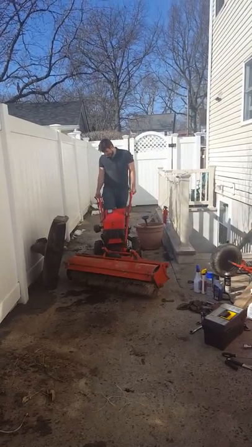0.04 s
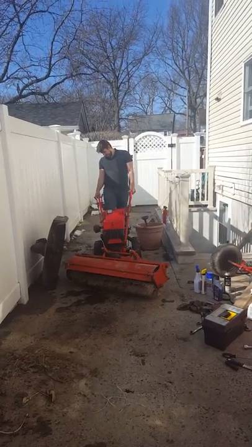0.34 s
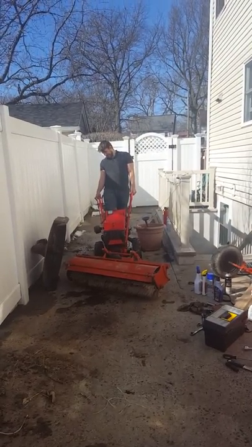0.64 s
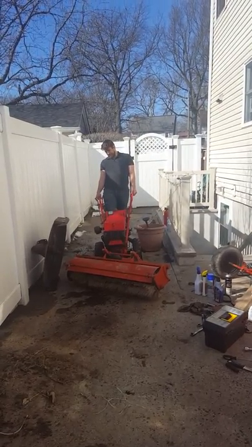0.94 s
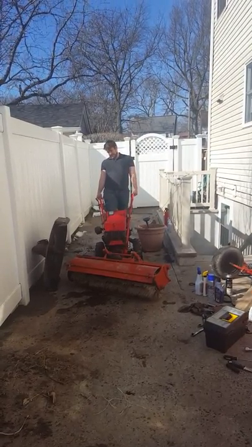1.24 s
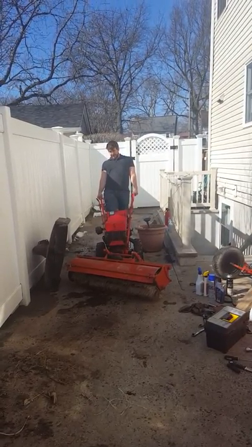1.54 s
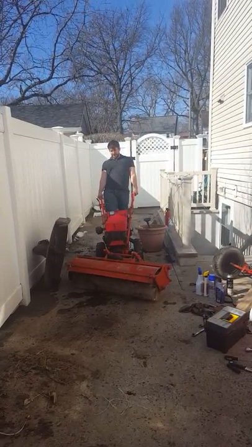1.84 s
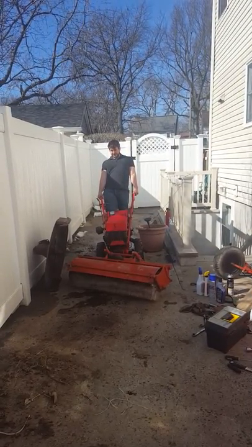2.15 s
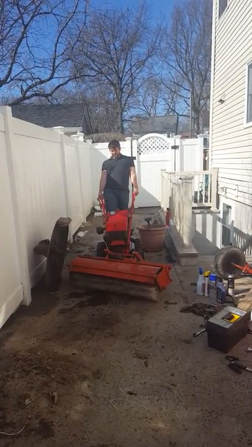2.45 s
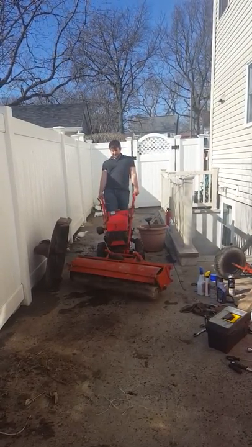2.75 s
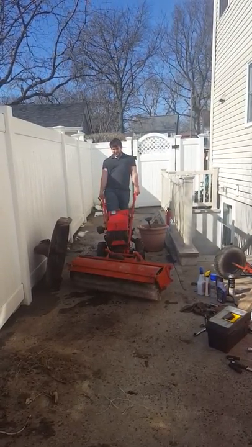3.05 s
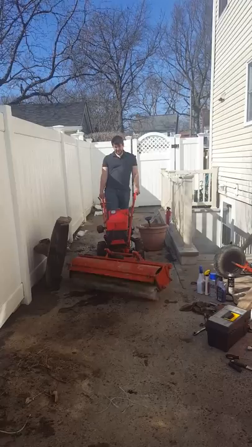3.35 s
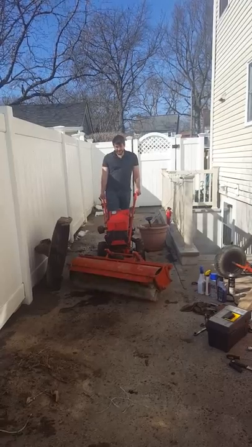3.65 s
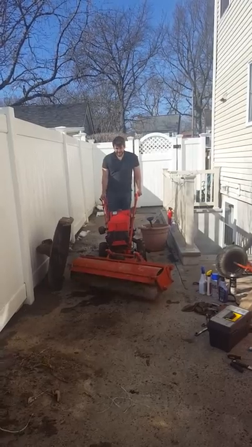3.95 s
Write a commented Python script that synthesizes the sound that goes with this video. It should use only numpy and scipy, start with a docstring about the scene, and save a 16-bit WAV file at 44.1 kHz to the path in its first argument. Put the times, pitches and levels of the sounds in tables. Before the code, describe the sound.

A small single-cylinder engine starts in a narrow yard. For the first 1.5 seconds there is only light wind on the microphone, a faint distant town and a few small clicks. At 1.6 seconds the starter grinds, with a clack and soft cylinder puffs. At about 2.7 seconds the engine catches and speeds up until 4 seconds, its loud thumps echoing closely over valve clatter and a rising gear whine.

```python
"""Light wind, a distant town and a few small clicks; then a single-cylinder four-stroke engine is started.
The starter's gear teeth grind for a second while the cylinder puffs; the engine catches and speeds up.
Each firing is a thump that flutters between the fence and house wall of a narrow yard, and a spit of gas.
Under the firings run valve clatter and a rising gear whine."""
import sys
import numpy as np
from scipy import signal
from scipy.fft import rfft, irfft
from scipy.io import wavfile

SR = 44100
rng = np.random.default_rng(int(sys.argv[2]) if len(sys.argv) > 2 else 0)


def pcm_store(signal):
    """Save signal as 16-bit PCM."""
    levels = np.round(np.clip(np.atleast_2d(signal), -1, 1) * 32767)
    wavfile.write(sys.argv[1], SR, levels.astype(np.int16).T)


N = 176400
FFT_SIZE = 196608


def undb(db):
    """Decibels to gain."""
    return 10 ** (np.asarray(db) / 20)


def unit(x):
    """Scale to rms 1."""
    return x / np.sqrt(np.mean(x ** 2))


def curve(rows, t, column=1):
    """One column of a table at the times t."""
    rows = np.array(rows)
    return np.interp(t, rows[:, 0], rows[:, column])


def gains(eq):
    """An EQ curve of (Hz, dB) points as gains on the FFT grid."""
    hz, db = np.array(eq).T
    grid_hz = np.arange(FFT_SIZE // 2 + 1) * SR / FFT_SIZE
    return undb(np.interp(np.log(grid_hz + 1e-9), np.log(hz), db))


def colour(x, eq):
    """Minimum-phase EQ: nothing rings ahead of a hit."""
    cepstrum = irfft(np.log(gains(eq)))
    cepstrum[1:FFT_SIZE // 2] *= 2
    cepstrum[FFT_SIZE // 2 + 1:] = 0
    return irfft(rfft(x, FFT_SIZE) * np.exp(rfft(cepstrum)))[..., :N]


def white():
    """White noise as a mid and side pair."""
    return rng.standard_normal((2, N))


def noise(eq):
    """A pair of coloured noises of rms 1."""
    return unit(colour(white(), eq))


def strikes(times, db):
    """Impulses at the given times and levels."""
    at = np.clip(np.asarray(times) * SR, 0, N).astype(int)
    return np.bincount(at, undb(db), N + 1)[:N]


def ring(x, response):
    """Pass x through an impulse response."""
    return signal.fftconvolve(np.atleast_2d(x), np.atleast_2d(response), axes=1)[:, :N]


def bursts(times, db, envelope):
    """White noise that follows one envelope after each event; overlaps add in power."""
    power = ring(strikes(times, 2 * np.asarray(db)), envelope ** 2)
    return np.sqrt(np.abs(power)) * white()


# The gusts. Each row: time in seconds, level in dB.
GUSTS = [(0.0, -61), (0.03, -41), (0.06, -60), (0.362, -47), (0.388, -66), (0.474, -48), (0.62, -64),
         (0.66, -46.5), (0.702, -66), (0.798, -61), (0.824, -43), (1.096, -51.5), (1.144, -76),
         (1.338, -57), (1.476, -60), (1.55, -56)]
# Their low rumble. Each row: frequency in Hz, relative level in dB.
WIND_EQ = [(20, -25), (50, -2.5), (75, 11), (120, -2), (220, -14.5), (500, -53)]
def breeze(t, trim_db=-4, right_over_left_db=18):
    """Light wind rumbles on the microphone, more on the right."""
    pan = undb(np.array([[-right_over_left_db], [right_over_left_db]]) / 2)
    return pan * undb(trim_db + curve(GUSTS, t)) * noise(WIND_EQ)[0]


# A dark ambience bed. Each row: frequency in Hz, relative level in dB.
TOWN_EQ = [(15, -4), (25, -2.5), (64, -4.5), (102, -3), (157, -4.5), (249, -8.5), (344, -17.5), (451, -16),
           (516, -20.5), (863, -19.5), (3160, -38), (6210, -42), (7510, -45), (14800, -46), (16000, -50)]
def town():
    """The faint, steady wash of a distant town."""
    return undb(-53) * noise(TOWN_EQ)


# The click cues. Each row: start in seconds, knock level in dB, tick level in dB.
CLICKS = [(.266, -49, -68), (.574, -53, -68), (.858, -56, -54), (.93, -49, -60), (1.155, -55, -61),
          (1.219, -45.5, -62)]
# Tone of the knock and of the tick. Each row: frequency in Hz, gain in dB.
KNOCK_EQ = [(200, -14), (800, 7), (1600, -4), (3000, -11), (6000, -16.5), (14000, -26)]
TICK_EQ = [(1500, -15), (4500, -1), (14000, -6), (16000, -15)]
def control_clicks(t, knock_fall_s=0.028, tick_fall_s=0.006):
    """Small clicks at the controls, each a dull knock with a bright tick on top."""
    times, knock_db, tick_db = np.array(CLICKS).T
    ticks = colour(bursts(times, tick_db, np.exp(-t / tick_fall_s)), TICK_EQ)
    knocks = colour(bursts(times, knock_db, np.exp(-t / knock_fall_s)), KNOCK_EQ)
    return knocks + ticks


# Metal resonances. Each row: pitch in Hz, relative level in dB.
HOUSING_MODES = [(231, -41), (380, -30), (436, -33), (474, -36), (587, -34), (786, -34), (903, -34.5),
                 (1077, -37.5), (1260, -40), (1631, -39.5), (2163, -44), (2828, -58), (5050, -47),
                 (6650, -46), (8500, -48)]
def housing(t, teeth, ring_s=0.026):
    """The starter and its housing ring as damped tones, shaken by the gear teeth."""
    brief = t[:SR // 2]
    decay = np.exp(-brief / ring_s)
    return sum(undb(db) * unit(ring(teeth, np.sin(2 * np.pi * hz * brief) * decay))
               for hz, db in HOUSING_MODES)


# The starter's faders. Each row: time in seconds, grind level in dB, hiss level in dB.
CRANK = [(1.55, -82, -78), (1.562, -41, -78), (1.592, -27.5, -35), (1.602, -26, -44), (1.616, -21.5, -31.5),
         (1.68, -22, -31.5), (1.714, -19.5, -30), (1.72, -17.5, -22.5), (1.776, -18, -27.5),
         (2.076, -18.5, -25.5), (2.126, -17, -27), (2.22, -18, -24), (2.26, -19, -24.5), (2.416, -16, -24),
         (2.512, -17.5, -25), (2.65, -18, -23.5)]
# Tone of its growl, grind and hiss. Each row: frequency in Hz, relative level in dB.
GROWL_EQ = [(40, -58), (90, -23), (150, 0), (240, -0.5), (390, -3), (700, -33)]
GRIND_EQ = [(50, -40), (100, -28), (140, -4), (220, -3), (420, -1), (502, -3.5), (676, 0), (1100, 1),
            (1580, -5.5), (1900, -7), (2270, -5), (2620, -11), (3000, -10), (3900, -18), (5650, -28),
            (6840, -29), (16000, -39)]
HISS_EQ = [(2500, -16.5), (4500, 3), (5700, 2), (6700, 5), (7800, 0.5), (11500, -3), (13700, -0.5),
           (16000, -7.5)]
def starter(t, free_teeth_per_s=230, sag=0.38, tooth_s=0.0054, release_s=2.8, coast_s=0.11):
    """Gear teeth grind, slowed by compression before each puff, and fade once the engine runs."""
    strokes = [at for at, db in PUFFS] + [SPEED[0][0]]
    compression = np.interp(t, strokes, np.arange(len(strokes))) % 1
    teeth_passed = np.cumsum(free_teeth_per_s * (1 - sag * compression)) / SR
    jitter, scatter = rng.standard_normal((2000, 2)).T
    times = np.interp(np.arange(len(jitter)) + 0.14 * jitter, teeth_passed, t, right=N / SR + 1)
    tooth_db = 2.5 * scatter
    growl = unit(colour(strikes(times, tooth_db), GROWL_EQ))
    teeth = unit(bursts(times, tooth_db, np.exp(-t / tooth_s))) + 0.98 * white()
    grind = unit(colour(teeth, GRIND_EQ)) + undb(18) * housing(t, teeth) + undb(-8) * growl
    hiss = noise(HISS_EQ) * undb(curve(CRANK, t, column=2) - 2.5)
    fade_in = np.clip((t - CRANK[0][0]) / 0.014, 0, 1)
    fade_out = np.exp(-np.maximum(t - release_s, 0) / coast_s)
    return fade_in * fade_out * (grind * undb(curve(CRANK, t)) + hiss)


# Unfired strokes. Each row: peak time in seconds, level in dB.
PUFFS = [(1.606, -49), (1.816, -27.5), (2.054, -26.5), (2.281, -27), (2.485, -28)]
# Their low breath. Each row: frequency in Hz, relative level in dB.
PUFF_EQ = [(30, -35), (60, -5), (90, 0), (125, 7), (170, -8), (400, -49)]
def puffs(t, pipe_hz=105, width_s=0.016):
    """The cranked cylinder lets out soft puffs that ring the exhaust briefly."""
    swells = sum(undb(db) * np.exp(-0.5 * ((t - at) / width_s) ** 2) for at, db in PUFFS)
    pipe = np.sqrt(2) * np.sin(2 * np.pi * pipe_hz * t) * np.array([[1], [0]])  # mid only
    return swells * (pipe + 0.46 * noise(PUFF_EQ))


# A hard, bright clack. Each row: frequency in Hz, gain in dB.
CLACK_EQ = [(500, -15), (2500, 2), (6000, 4.5), (9000, -2.5), (16000, 2)]
def gear_clack(t, start_s=1.72, fall_s=0.035):
    """The starter gear bangs home."""
    return colour(bursts([start_s], [-19.5], np.exp(-t / fall_s)), CLACK_EQ)


# The run-up, from the first firing. Each row: time in seconds, firings per second.
SPEED = [(2.663, 6.506), (2.8, 7.753), (2.95, 12.756), (3.15, 18.439), (3.35, 22.179), (3.6, 25.308),
         (4.0, 28.154)]
def run_up(t):
    """The engine fires once a cycle: gives the running cycle count and the firing times."""
    cycles = np.cumsum(curve(SPEED, t) * (t >= SPEED[0][0])) / SR
    firings = t[np.searchsorted(cycles, np.arange(int(cycles[-1]) + 1), side="right")]
    return cycles, firings


# Punch of the firings. Each row: time in seconds, then thump, bark and gas spit drive in dB.
EFFORT = [(2.66, 35, 31, -17), (2.85, 36, 26.5, -12.5), (3.0, 35, 22, -13), (3.2, 35.5, 29, -15),
          (3.45, 31, 33, -18.5), (3.7, 30.5, 35, -19), (4.0, 35.5, 34.5, -19.5)]
# Tone of the deep thump and of the bark above it. Each row: frequency in Hz, gain in dB.
THUMP_EQ = [(20, -62), (35, -29), (50, -5.5), (75, 2.5), (105, 5), (160, -2.5), (250, -13.5), (500, -40),
            (1500, -71)]
BARK_EQ = [(30, -41), (90, -12), (145, 6), (200, 0.5), (260, -0.5), (340, -23), (500, -25.5), (1500, -52)]
# Slapback from fence and house. Each row: delay in seconds, gain.
WALLS = [(.0096, 0.51), (0.0147, 0.38), (0.0186, .36), (.0285, 0.45), (.041, 0.22)]
def exhaust(t, firings, lead_s=0.0008, reverb_fall_s=0.05):
    """A pressure pulse just ahead of each spit of gas, fluttering between the walls."""
    times = firings - lead_s
    scatter = rng.standard_normal((len(times), 2))
    thump = strikes(times, curve(EFFORT, times) + 0.5 * scatter[:, 0])
    bark = strikes(times, curve(EFFORT, times, column=2) + 0.81 * scatter[:, 1])
    direct = colour(thump, THUMP_EQ) + colour(bark, BARK_EQ)
    echoes = sum(gain * np.interp(t - delay, t, direct, left=0) for delay, gain in WALLS)
    tail = white() * np.exp(-t / reverb_fall_s)
    reverb = undb(-13) * ring(direct, tail / np.linalg.norm(tail))
    return np.array([direct + echoes, echoes]) + reverb


# The sizzle of the gas. Each row: frequency in Hz, gain in dB.
SPIT_EQ = [(300, -1.5), (1200, -8), (2800, 1), (4000, -6.5), (6200, -0.5), (8000, -3), (11000, 0.5),
           (13700, 4.5), (16000, -3)]
def gas_spit(t, firings, rise_s=0.0049, fall_s=0.0043, wash_fall_s=0.033):
    """A sharp spit of gas at each firing; its wash in the yard weakens with speed."""
    spit = np.minimum(t / rise_s, 1) * np.exp(-np.maximum(t - rise_s, 0) / fall_s)
    wash = np.minimum(t / 0.02, 1) * np.exp(-np.maximum(t - 0.016, 0) / wash_fall_s)
    spit_db = curve(EFFORT, firings, column=3) + 0.65 * rng.standard_normal(len(firings))
    wash_db = spit_db - 2 - 0.17 * curve(SPEED, firings)
    return colour(bursts(firings, spit_db, spit) + bursts(firings, wash_db, wash), SPIT_EQ)


# The clatter's fader. Each row: time in seconds, level in dB.
CLATTER_LEVEL = [(2.64, -45), (2.85, -19), (3.0, -20), (3.25, -20), (3.5, -20.5), (3.75, -20.5), (4.0, -22)]
# Its boxy tone. Each row: frequency in Hz, relative level in dB.
CLATTER_EQ = [(180, -22.5), (300, 1.5), (343, -6.5), (447, -6), (502, -7), (994, -5.5), (1190, -6.5),
              (1610, -10.5), (1750, -13.5), (2170, -13), (3890, -21), (6000, -19.5), (7570, -26),
              (9090, -20.5), (12300, -35), (13800, -26), (16000, -29)]
def valve_clatter(t, cycles, per_cycle=8, knock_s=0.0031):
    """Valves and piston knock in the same pattern every cycle, over a bed of noise."""
    pattern = (np.arange(per_cycle) + rng.uniform(-0.3, 0.3, per_cycle)) / per_cycle
    knock_cycles = np.arange(int(cycles[-1]) + 1)[:, None] + pattern
    accents_db = -2 * rng.standard_normal(per_cycle)
    db = accents_db + 0.54 * rng.standard_normal(knock_cycles.shape)
    times = np.interp(knock_cycles.ravel(), cycles, t)
    knocks = bursts(times, db.ravel(), np.exp(-t / knock_s))
    clatter = colour(knocks + 0.83 * white(), CLATTER_EQ)
    clatter /= np.std(clatter[0, cycles > 1])
    return clatter * undb(curve(CLATTER_LEVEL, t)) * (cycles > 0)


# The whine's fader. Each row: time in seconds, level in dB.
WHINE_LEVEL = [(3.0, -37), (3.3, -36), (3.75, -29.5), (4.0, -31)]
def gear_whine(t, cycles, teeth_per_cycle=31):
    """A gear whines higher as the engine speeds up, wavering once a cycle."""
    angle = 2 * np.pi * cycles
    tone = np.sqrt(2) * np.sin(teeth_per_cycle * angle + 0.28 * np.sin(angle))
    return tone * undb(curve(WHINE_LEVEL, t)) * (cycles > 0)


# Stereo width. Each row: frequency in Hz, gain of the side channel in dB.
WIDTH = [(60, -16), (125, -28), (250, -13), (500, -9.5), (1000, -8), (2000, -2), (4000, 0.5), (14000, -0.5)]
# Balance. Each row: frequency in Hz, left over right in dB.
BALANCE = [(100, -0.6), (300, -2.5), (650, 1), (1250, -1.6), (2300, 1.6), (4400, -0.5), (8000, -0.5),
           (14000, -3.5)]
def spread(pair):
    """Mid and side to left and right: the treble is diffuse, the bass stays central."""
    mid, side = rfft(pair, FFT_SIZE)
    side = side * gains(WIDTH)
    lean = np.sqrt(gains(BALANCE))
    return irfft(np.array([(mid + side) * lean, (mid - side) / lean]))[:, :N]


def scene():
    """Cranking gives way to the running engine in the middle of the yard, over town and wind."""
    t = np.arange(N) / SR
    cycles, firings = run_up(t)
    starting = starter(t) + puffs(t) + control_clicks(t) + gear_clack(t)
    firing = exhaust(t, firings) + gas_spit(t, firings)
    mechanism = valve_clatter(t, cycles) + gear_whine(t, cycles)
    return spread(starting + firing + mechanism + town()) + breeze(t)


def record(dry):
    """Clip at full scale, then cut the top with a steep low-pass."""
    top_hz = 15900
    lowpass = signal.ellip(10, 0.2, 80, top_hz, fs=SR, output="sos")
    return signal.sosfilt(lowpass, np.clip(dry, -1, 1))


dry = scene()
out = record(dry)
pcm_store(out)
```